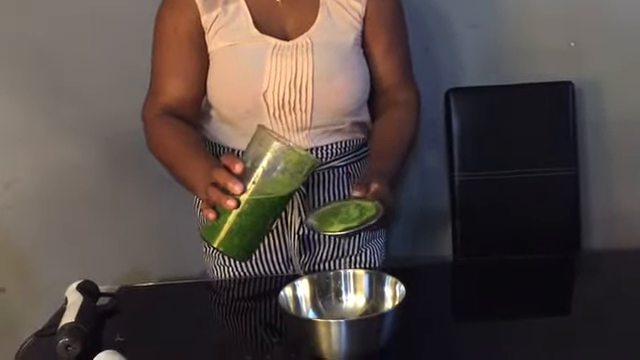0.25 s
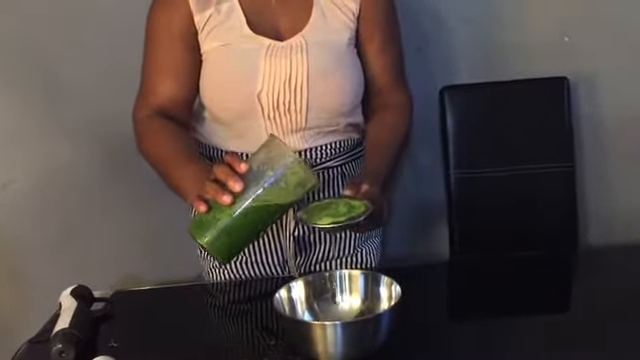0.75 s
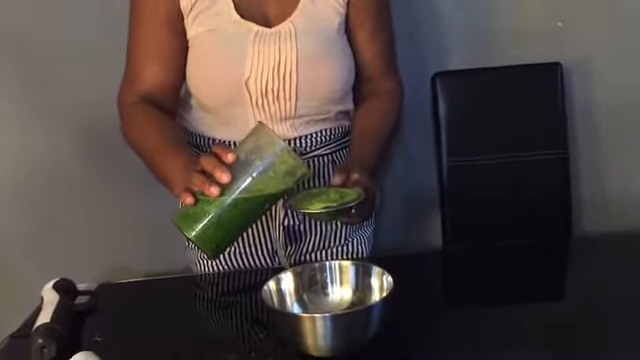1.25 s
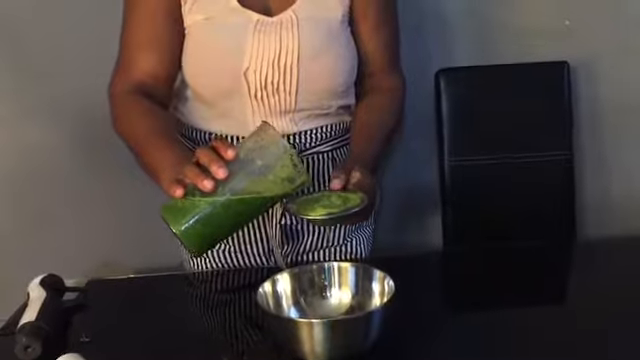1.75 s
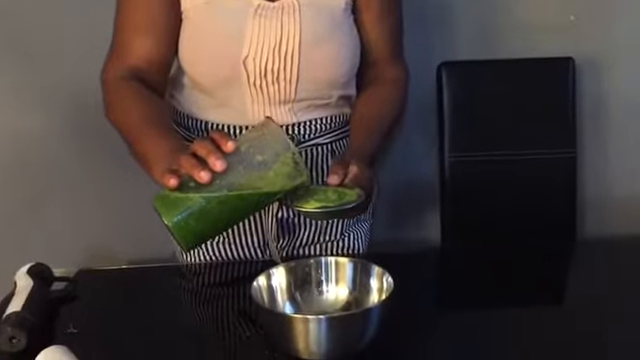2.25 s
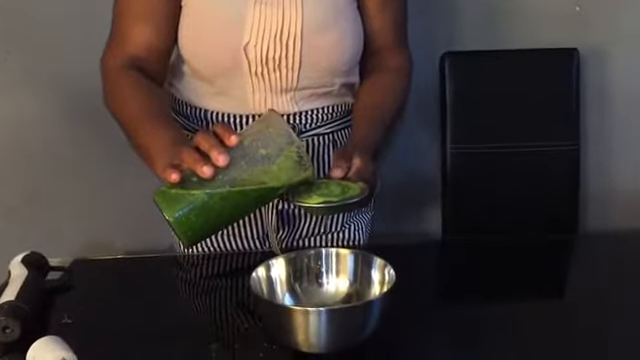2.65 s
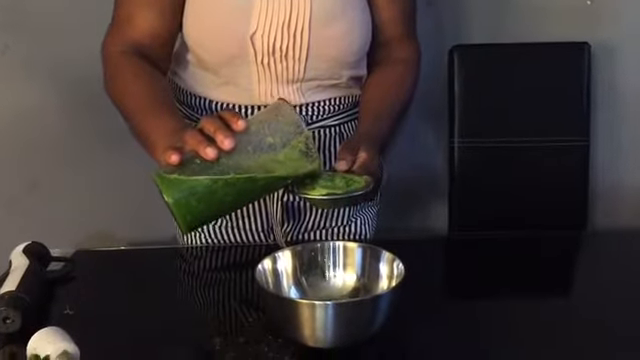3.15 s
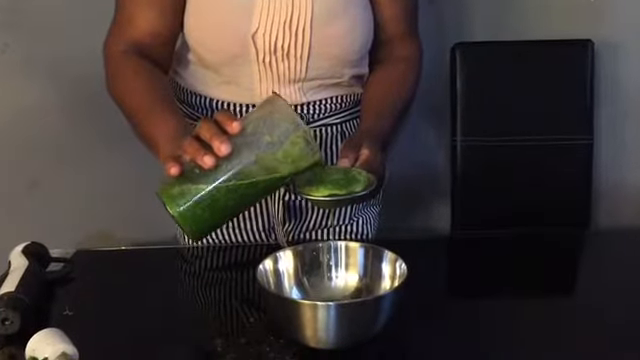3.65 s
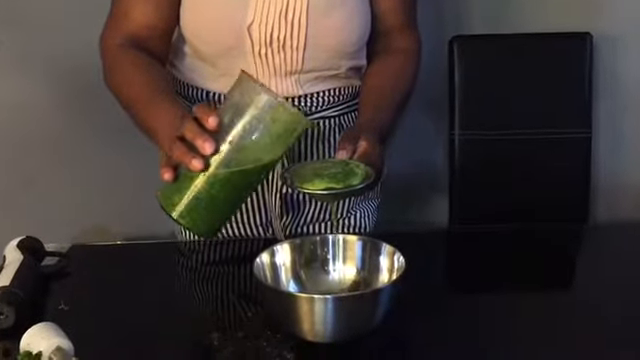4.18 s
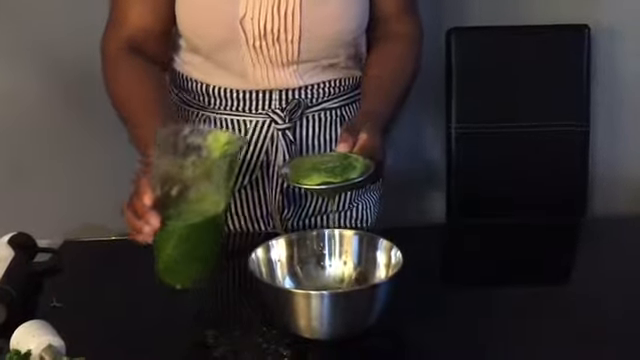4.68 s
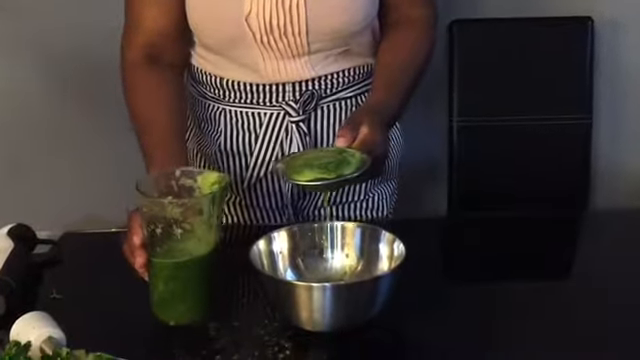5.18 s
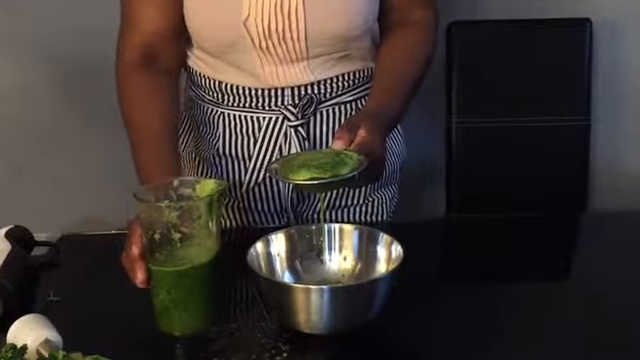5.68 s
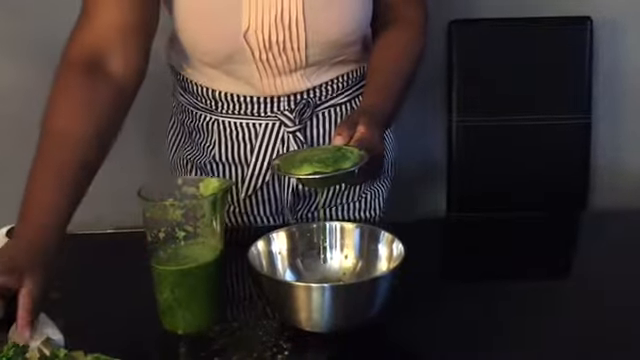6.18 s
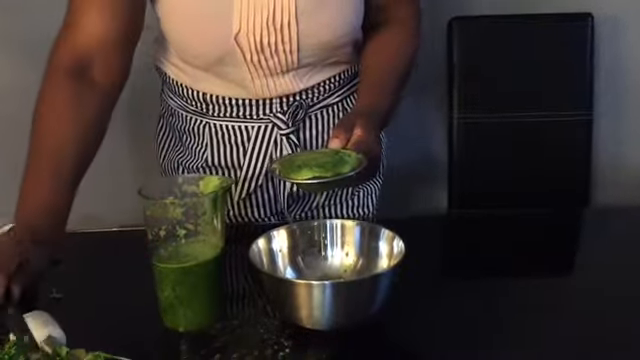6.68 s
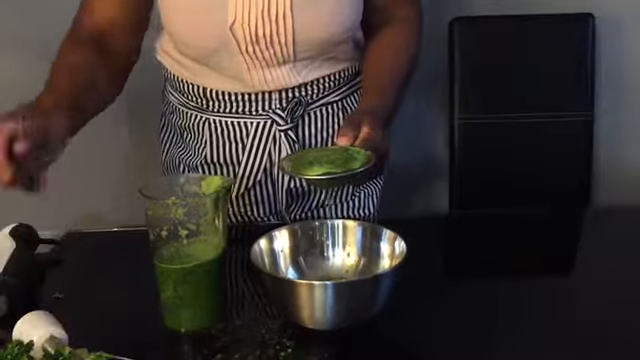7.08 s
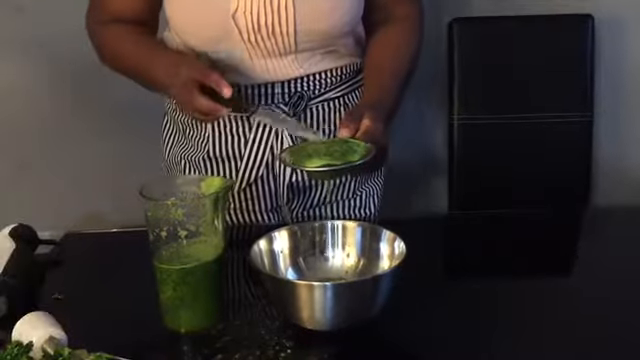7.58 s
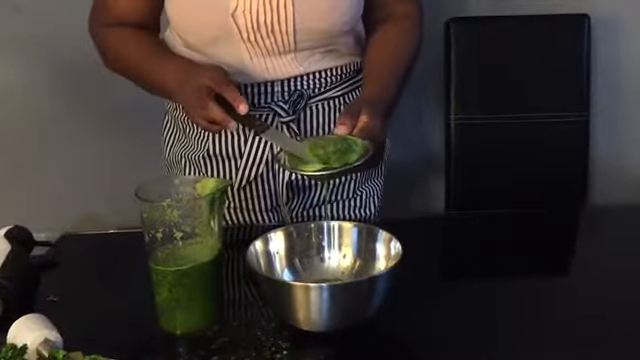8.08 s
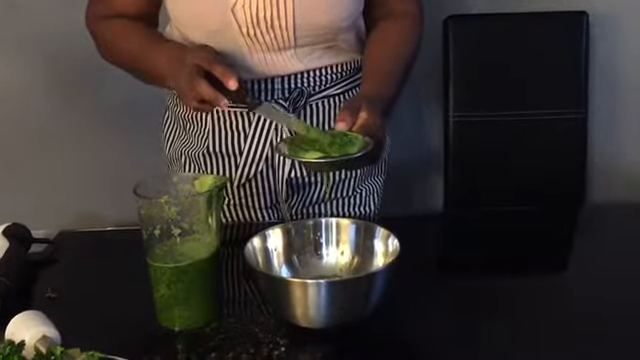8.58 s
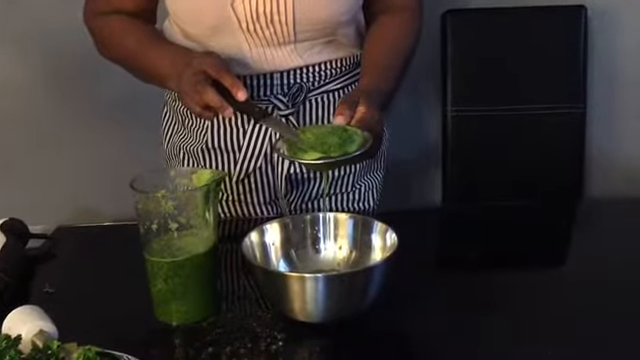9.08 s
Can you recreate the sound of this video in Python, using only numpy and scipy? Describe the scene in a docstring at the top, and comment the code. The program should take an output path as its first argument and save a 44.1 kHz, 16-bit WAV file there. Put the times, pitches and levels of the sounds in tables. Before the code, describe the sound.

Thick green juice drips through a small sieve into a nearly empty steel bowl. Low plops and bright metallic splats patter quickly, thin out, then thicken again. Midway a full glass jar lands on the stone table with one dull thud. Dripping continues busily, with soft faint bumps. Hard-walled kitchen, phone a metre or two away, faint room hush.

```python
"""Short plops and sharp splats run throughout: thick juice drips from a sieve into an empty steel bowl on a stone table.
Each drop is a brief decaying sine with an impact tick, small drops are a random patter, and spray is bursts of noise.
The drops ring the bowl through resonators; a full jar set down once thuds by shaking table, jar and bowl.
Soft low bumps from hands and feet join in, and a hard-walled kitchen answers with a noise-built tail.
A phone a metre or two away hears it over a faint, unsteady room hush."""
import sys
import numpy as np
from scipy import signal
from scipy.fft import rfft, irfft
from scipy.io import wavfile
from scipy.ndimage import uniform_filter1d

SR = 44100
rng = np.random.default_rng(int(sys.argv[2]) if len(sys.argv) > 2 else 0)


def wav_out(sig):
    """Save sig, one row per channel (or a flat mono array), as 16-bit PCM at SR to the path in sys.argv[1]."""
    wavfile.write(sys.argv[1], SR, np.round(np.clip(np.atleast_2d(sig).T, -1, 1) * 32767).astype(np.int16))


N = 411894

# Heavy drops that land softly. Each row: start in seconds, relative level in dB, pitch in Hz,
# decay to 1 / e in cycles.
PLOPS = [(0.059, -33, 808, 1.5), (0.1, -36, 1090, 5.3), (0.101, -36.5, 1637, 5.7), (0.191, -44, 1120, 4.6),
         (0.193, -36, 1577, 5), (0.234, -41.5, 903, 6.2), (0.289, -23, 1098, 0.37), (0.419, -32, 713, 3),
         (0.562, -27.5, 804, 0.54), (0.563, -31, 1500, 1.8), (0.652, -33, 1616, 7.5),
         (0.748, -44, 700, 4.3), (0.79, -46, 625, 5), (0.812, -45.5, 1120, 8.2), (1.034, -34.5, 1650, 2.8),
         (1.044, -38.5, 870, 3.1), (1.096, -37.5, 900, 2.2), (1.141, -33, 810, 2.1), (1.17, -39, 827, 2.7),
         (1.171, -36, 1680, 4), (1.205, -39, 1560, 12), (1.274, -34.5, 1873, 7.9), (1.377, -35, 1003, 1.8),
         (1.589, -35.5, 1570, 3.6), (1.59, -37.5, 1105, 4.4), (1.816, -33.5, 1140, 1.6),
         (1.84, -38, 1660, 3.8), (1.862, -32, 940, 2), (2.093, -44, 1700, 7.2), (2.06, -45, 1320, 6),
         (2.122, -37, 1270, 3.8), (2.576, -43.5, 1580, 7.6), (2.604, -41, 1656, 12),
         (2.897, -44.5, 1360, 12), (2.997, -46.5, 1624, 13), (4.029, -27.5, 2060, 0.33),
         (4.131, -28.5, 820, 0.41), (4.132, -41, 1660, 6.5), (4.133, -36, 2010, 4.7),
         (4.246, -30.5, 746, 3.4), (4.247, -37, 1600, 5.7), (4.315, -43, 1624, 8.5),
         (4.345, -40.5, 1240, 4.3), (4.401, -41.5, 1530, 6), (4.403, -38.5, 846, 4.1),
         (4.489, -36.5, 660, 3.5), (4.614, -37, 786, 2.8), (4.645, -37.5, 664, 4), (4.665, -41, 1633, 7.3),
         (4.792, -38, 1620, 4.3), (4.924, -37, 694, 1.8), (4.946, -29.5, 660, 1.4),
         (5.071, -34.5, 630, 4.4), (5.195, -37, 710, 1.2), (5.596, -32, 671, 2.5), (5.625, -51, 637, 5.3),
         (5.676, -35.5, 1100, 5.3), (5.765, -46, 1530, 5.4), (5.774, -37, 690, 2.6), (5.82, -39, 616, 2.2),
         (5.881, -39, 1110, 2.2), (5.919, -32.5, 1035, 1.3), (5.921, -37, 2020, 7),
         (5.975, -37.5, 1730, 3.7), (6.048, -40, 1670, 3.6), (6.079, -24, 1560, 0.5), (6.1, -40, 1770, 10),
         (6.291, -33.5, 770, 0.54), (6.345, -40, 973, 5.4), (6.414, -39, 1654, 6.7),
         (6.44, -32.5, 2047, 7.6), (6.521, -37.5, 1280, 6.5), (6.544, -38.5, 1274, 4.3),
         (6.799, -36, 980, 1.2), (6.912, -31, 1020, 0.67), (6.982, -31.5, 1943, 15), (7.079, -42.5, 740, 3),
         (7.202, -44, 1610, 5.7), (7.343, -37, 1405, 4.1), (7.345, -43, 2120, 12),
         (7.507, -30.5, 1260, 0.44), (7.551, -33, 1145, 0.69), (7.674, -38.5, 1385, 6.6),
         (7.735, -41, 2160, 5), (7.996, -38.5, 1590, 1.1), (8.244, -31, 1440, 0.62),
         (8.425, -31.5, 1060, 0.71), (8.468, -35, 973, 4), (8.469, -40, 1990, 11), (8.489, -34, 730, 1.7),
         (8.632, -42, 1580, 6), (8.69, -49, 650, 4), (8.728, -38.5, 683, 3.4), (8.782, -32, 1700, 2.8),
         (8.835, -30.5, 1330, 3.1), (8.911, -29.5, 805, 1.8), (8.916, -36, 1750, 5.4),
         (8.967, -29.5, 1860, 2.7), (8.986, -29.5, 1725, 4.7), (9.036, -38, 1606, 6.4),
         (9.121, -33.5, 1250, 3.1), (9.249, -33.5, 710, 2.7), (9.29, -34.5, 1640, 8.3)]
# Drops that burst on bare steel. Each row: start in seconds, relative level in dB, pitch in Hz,
# decay to 1 / e in cycles.
SPLATS = [(0.0677, -29.5, 3000, 2.2), (0.0987, -38, 4010, 20), (0.192, -34.5, 2740, 9.7),
          (0.3889, -33, 3700, 3.6), (0.41, -37, 3780, 4.2), (0.43, -39, 3840, 5.4),
          (0.46, -32.5, 3440, 1.9), (0.5044, -39, 3550, 2), (0.5589, -34, 3400, 3),
          (0.7123, -31.5, 2940, 2.4), (0.847, -38.5, 2550, 8.7), (0.929, -38.5, 4500, 2.1),
          (0.969, -41, 4330, 4), (1.1165, -39.5, 3200, 2.7), (1.2, -42, 3920, 2.6), (1.41, -46, 2540, 9.3),
          (1.4484, -40, 3250, 3.7), (1.5399, -41.5, 3110, 14), (1.6788, -34, 3770, 1.8),
          (1.8126, -40.5, 2190, 9.7), (1.845, -37.5, 2190, 8), (1.904, -46, 4260, 3.2),
          (2.071, -46.5, 3870, 4), (2.577, -39.5, 3180, 2.6), (2.944, -47, 3470, 5.3),
          (3.089, -40, 3070, 0.86), (3.67, -40, 5530, 5), (4.0284, -25, 3360, 0.91),
          (4.155, -40.5, 4600, 4), (4.2327, -26.5, 4700, 1.7), (4.27, -35.5, 3600, 3),
          (4.361, -29, 4390, 6), (4.423, -43, 3300, 13), (4.548, -36, 4040, 5), (4.572, -46, 4300, 3),
          (4.606, -39.5, 4540, 2.8), (4.662, -45, 3280, 4.6), (4.68, -40.5, 3460, 2.5),
          (4.778, -40, 2600, 3.3), (4.8915, -36.5, 3440, 6), (4.923, -39.5, 3450, 4.6),
          (5.048, -45, 3650, 3.5), (5.0714, -25, 3480, 6.9), (5.1637, -40.5, 3400, 11),
          (5.2175, -31, 3170, 5.3), (5.255, -31.5, 3740, 2.5), (5.268, -37, 5570, 3.9),
          (5.4054, -32, 3530, 2.7), (5.411, -33.5, 5300, 5.5), (5.436, -39, 5500, 4.3),
          (5.452, -40, 5700, 5), (5.471, -32, 3340, 5.8), (5.5058, -32, 2500, 1.7),
          (5.5603, -35, 5340, 6.3), (5.561, -36, 4020, 5.7), (5.7295, -45, 3280, 6.2),
          (5.746, -44, 3450, 5), (5.764, -44, 2820, 3.7), (5.8082, -36, 5230, 3.6), (5.811, -47, 3080, 4),
          (5.88, -37.5, 5460, 4.4), (5.9085, -31.5, 3240, 1.4), (5.974, -26, 5090, 8),
          (5.9745, -25, 3200, 3), (6.008, -37, 3780, 4.5), (6.079, -48, 3460, 3), (6.1006, -42, 3230, 4.5),
          (6.1335, -30, 3020, 1.4), (6.2223, -36.5, 5440, 2.7), (6.299, -37, 2600, 2.4),
          (6.374, -27, 3220, 3.2), (6.4816, -37.5, 3400, 5.5), (6.542, -33.5, 3630, 4.7),
          (6.5975, -43, 3380, 5.8), (6.635, -41.5, 3500, 4.4), (6.6792, -33, 3680, 0.69),
          (6.7276, -34.5, 3350, 2.8), (6.834, -44.5, 3460, 5), (6.915, -45, 3100, 3),
          (6.932, -38, 3600, 1.5), (6.969, -34.5, 3860, 4.7), (6.982, -33, 2150, 1.6),
          (7.092, -41, 3470, 4.3), (7.2002, -25.5, 3240, 4.6), (7.2544, -39, 3730, 3.5),
          (7.227, -50, 3420, 3.8), (7.266, -39, 3400, 2.8), (7.401, -38.5, 3670, 8.2),
          (7.5527, -34.5, 2500, 6.2), (7.669, -31, 3180, 2.9), (7.734, -30, 4010, 5.6),
          (7.7934, -27.5, 3200, 0.78), (7.8466, -39, 3500, 5), (7.9244, -32.5, 3230, 4.9),
          (8.1806, -39.5, 4150, 9.1), (8.2034, -42, 3380, 5), (8.2933, -36.5, 3820, 5.1),
          (8.3395, -42, 3500, 4), (8.3779, -40, 3240, 5.1), (8.419, -41, 4200, 5.9),
          (8.468, -39.5, 2680, 4.2), (8.52, -37, 3230, 7.5), (8.558, -41, 3040, 5),
          (8.5822, -32, 3230, 6.4), (8.6318, -36, 3160, 5.4), (8.717, -44, 4600, 2.5),
          (8.764, -34.5, 3480, 1.1), (8.8316, -36.5, 4330, 5.5), (8.9268, -35, 3650, 4.4),
          (8.9635, -22, 3630, 5.9), (8.985, -25.5, 3940, 7.5), (9.002, -37, 3550, 6.6),
          (9.157, -47, 3360, 6), (9.21, -47, 3250, 6), (9.2415, -39.5, 3400, 2.7), (9.2866, -37, 2480, 3),
          (9.3007, -28.5, 4340, 2.3)]
# Modes of the steel bowl. Each row: frequency in Hz, relative level in dB, decay by 60 dB in seconds.
BOWL_MODES = [(625, -6, .4), (662, -4, .4), (719, -2, .35), (768, -6, .25), (811, -1, .35), (863, -4, .35),
              (919, 0, .45), (954, 0, .4), (1014, -3, .4), (1081, -4, .4), (1122, -7, .3), (1152, -3, .4),
              (1284, -1, .5), (1385, -7, .3), (1470, -6, .3), (1540, -7, .25), (1650, -5, .25),
              (1700, -1, .3), (1755, -4, .2), (1985, -7, .25), (2170, -6, .22), (2350, -10, .2),
              (2670, -11, .18), (3050, -9, .15), (3380, -11, .12), (3560, -12, .12), (4120, -10, .15),
              (4470, -10, .15), (5300, -12, .12)]


def undb(db):
    """Definition of the decibel: an amplitude gain is ten to the power of dB / 20."""
    return 10 ** (np.asarray(db) / 20)


def unit(x):
    """Normalisation of power: scale a signal to rms 1."""
    return x / np.sqrt(np.mean(x ** 2))


def wander(rate_hz):
    """Slow random modulation: normal values, each held 1 / rate_hz s, smoothed by a moving mean as long."""
    hold = int(SR / rate_hz)
    steps = np.repeat(rng.standard_normal(N // hold + 1), hold)
    return uniform_filter1d(steps, hold)[:N]


def butter(x, order, hz, kind):
    """Linear filtering: a Butterworth filter, flat in its pass band."""
    return signal.sosfilt(signal.butter(order, hz, kind, fs=SR, output="sos"), x)


def add_drop(out, s, db, hz, cycles, glide=0., tick=0., rise=0.5):
    """Damped oscillation: an impact tick and a sine that dies in a few cycles, rising as the cavity closes."""
    cycles = np.clip(cycles, .4, 40)
    turns = np.arange(int(5 * cycles * SR / hz) + 2) * hz / SR
    shape = np.exp(-turns / cycles) * (1 - np.exp(-turns / rise))  # rise is in cycles too
    wave = shape / shape.max() * np.sin(2 * np.pi * turns * (1 + glide * turns / cycles))
    wave += tick * 2.0 * turns * np.exp(-turns / 0.55) * np.sin(2 * np.pi * 1.49 * turns)
    start = min(int(s * SR), N)
    out[start:start + len(wave)] += undb(db) * wave[:max(N - start, 0)]


def heavy_drops(table, glide, tick, rise, after_s, after_db):
    """Superposition of damped oscillations: each drop's tail follows in smaller beads of nearly its pitch."""
    beads_each, bead_spread = 5, 0.16  # count, and the share by which their pitch varies
    out = np.zeros(N)
    for (s, db, hz, cycles), beads in zip(table, rng.random((len(table), beads_each, 3))):
        add_drop(out, s, db, hz, cycles, glide, tick, rise)
        for late, size, pitch in beads:
            bead_db = db + after_db * (.5 + late + size)
            bead_hz = hz * (1 + bead_spread * (pitch - .5))
            add_drop(out, s + after_s * late, bead_db, bead_hz, max(cycles, 3), glide, 0, rise)
    return out


def splash(table, fade_s, low_hz=0, high_hz=SR):
    """Exponential relaxation: the level of thrown droplets jumps with each drop of a pitch range and fades."""
    kicks = np.zeros(N)
    s, db, hz = np.transpose(table)[:3]
    np.add.at(kicks, (s * SR).astype(int), undb(db) * (hz > low_hz) * (hz <= high_hz))
    return signal.lfilter([1], [1, -np.exp(-1 / (fade_s * SR))], kicks)


def patter(low_hz, high_hz, cycles, count, sizes_db=13):
    """Superposition of random impacts: many small drops of random time, pitch and size; rms 1."""
    out = np.zeros(N)
    for when, pitch, size in rng.random((count, 3)):
        hz = low_hz * (high_hz / low_hz) ** pitch
        add_drop(out, when * N / SR, sizes_db * size, hz, cycles, tick=0.18)
    return unit(out)


def small_drops():
    """Amplitude modulation of patter: a slow dribble level plus droplets thrown by each heavy drop."""
    # The dribble between heavy drops. Each row: time in seconds, then the base levels in dB
    # of fat, middling and fine drops.
    dribble = [(0.0, -55, -52.5, -69.5), (0.34, -55.5, -69, -60.5), (0.91, -57, -59.5, -65.5),
               (1.22, -61, -64, -67.5), (1.69, -62.5, -63, -76.5), (1.98, -63.5, -57.5, -67.5),
               (2.68, -80.5, -66.5, -71.5), (3.61, -73.5, -62, -69), (4.06, -61, -67.5, -66.5),
               (4.27, -74, -71, -61), (4.63, -51, -58.5, -66.5), (5.33, -57, -51, -58.5),
               (5.62, -50, -54, -66.5), (6.43, -63.5, -60.5, -68.5), (8.27, -67, -70.5, -71),
               (8.59, -52, -56.5, -61), (9.03, -56, -63, -66), (9.34, -57, -58, -70)]
    s, *columns = np.transpose(dribble)
    fat_db, middling_db, fine_db = (np.interp(np.arange(N) / SR, s, db) for db in columns)
    split_hz = 1180  # deep plops lie below, high ones above
    deep = splash(PLOPS, 0.012, high_hz=split_hz)
    high = splash(PLOPS, 0.0091, low_hz=split_hz)
    burst = splash(SPLATS, 0.011)

    fat_level = undb(fat_db) + undb(-17) * deep
    middling_level = undb(middling_db) + undb(-17.5) * deep + undb(-22) * high
    fine_level = undb(fine_db + 5.4 * wander(14)) + undb(-24.5) * burst + undb(-23.5) * high
    mist_level = undb(fine_db - 8.0 + 4.1 * wander(14))

    fat = fat_level * patter(624.6, 1182, 3.37, count=600)
    middling = middling_level * patter(1194, 2393, 4.1, count=700)
    fine = fine_level * patter(2505, 4430, 2.9, count=2000)
    mist = mist_level * patter(4220, 13300, 3.2, count=2500, sizes_db=12.4)
    return fat + middling, fine, mist


def spray():
    """Band-limited noise bursts: spray ticks on the rim around a pitch, then fizzes with random crackle."""
    # Fine spray. Each row: start in seconds, relative level in dB, pitch in Hz.
    spray_ticks = [(0.2882, -50, 11900), (0.6245, -48, 7340), (0.6537, -46, 7000), (0.7808, -42, 7700),
                   (1.116, -44, 14000), (1.17, -49, 14300), (1.413, -50.5, 7750), (1.447, -51, 14100),
                   (1.6434, -47, 11900), (2.548, -54, 7540), (3.32, -49, 6700), (3.6706, -53, 8300),
                   (4.0156, -48.5, 9640), (4.087, -41.5, 9000), (4.1127, -42, 8400), (4.268, -45.5, 9400),
                   (4.453, -46.5, 9400), (4.5488, -49.5, 9100), (4.591, -49, 11400), (4.679, -39, 8300),
                   (5.216, -48, 7500), (5.436, -50, 6900), (5.5862, -49.5, 9500), (5.8086, -42.5, 14600),
                   (6.222, -49.5, 12100), (6.412, -46, 6300), (6.5136, -52.5, 7850), (6.884, -55, 12000),
                   (6.9822, -36.5, 5730), (6.9816, -43, 8200), (6.9817, -39, 11100), (6.9818, -42, 14300),
                   (7.472, -61, 9000), (7.5508, -43, 9500), (7.7752, -53, 12500), (8.2482, -48, 6460),
                   (8.379, -51.5, 8740), (8.4672, -50, 9300), (8.5805, -42.5, 11500), (8.8313, -43.5, 6040),
                   (9.085, -47.5, 8700), (9.2409, -51.5, 8800), (9.2853, -52.5, 10600)]
    tick_s, fizz_s, fizz_db = 0.0016, 0.019, -12.5  # the tick dies by 1 / e in tick_s
    half_band = 2 ** (0.41 / 2)  # the band is 0.41 octave wide
    out, t = np.zeros(N + SR), np.arange(SR // 10) / SR
    noises = rng.standard_normal((len(spray_ticks), 2, len(t)))
    for (s, db, hz), (hiss, jumps) in zip(spray_ticks, noises):
        band = [hz / half_band, min(hz * half_band, .45 * SR)]
        crackle = undb(6.9 * np.repeat(jumps, SR // 1000)[:len(t)])  # a new level about every millisecond
        fizz = undb(fizz_db) * crackle * t / fizz_s * np.exp(1 - 2 * t / fizz_s)
        burst = unit(butter(hiss, 2, band, "band")) * (np.exp(-t / tick_s) + fizz)
        out[int(s * SR):int(s * SR) + len(t)] += undb(db) * burst
    return out[:N]


def ring(x, modes, place_db=0.):
    """Modal synthesis: one damped resonator a mode, in alternating sense; place_db varies their drive in time."""
    out = 0
    for k, (hz, db, t60) in enumerate(modes):
        pole = np.exp(2j * np.pi * hz / SR - np.log(1000) / (t60 * SR))
        drive = x * undb(place_db * wander(12))  # each blow lands elsewhere
        out = out + (-1) ** k * undb(db) * signal.lfilter([1], [1, -pole], drive).imag
    return out


def drops():
    """Forced vibration: landing drops drive the bowl, which radiates little below its first mode."""
    fat_and_middling, fine, mist = small_drops()
    plops = heavy_drops(PLOPS, 0.0084, 0.22, rise=0.98, after_s=.085, after_db=-9)
    splats = heavy_drops(SPLATS, 0.021, 0.075, rise=1.37, after_s=.06, after_db=-12.5)
    soft, sharp = plops + fat_and_middling, splats + fine
    ringing = ring(undb(-56) * soft + undb(-49.0) * sharp, BOWL_MODES, place_db=3.5)

    bright = undb(-4.5) * sharp + mist + undb(-3.0) * spray()
    echo_s, echo_db = 0.002006, -9.5  # the far side of the bowl throws the bright sounds back
    echo = undb(echo_db) * np.roll(bright, int(echo_s * SR))
    landing = undb(-6) * soft + bright + echo
    return butter(landing, 4, 540, "high"), butter(ringing, 4, 540, "high")


def jar(push_s=0.00072):
    """Impulsive excitation: a push shakes table, jar and bowl, and leaves a dull, noisy low rumble that dies away."""
    # The jar meets the table. Each row: start in seconds, relative level of the push in dB.
    jar_blow = [(5.364, -17)]
    # Modes of the table top. Each row: frequency in Hz, relative level in dB, decay by 60 dB in seconds.
    table_modes = [(75, -16, .6), (133, -1, .33), (200, -9, .2), (243, -6, .3), (269, -2, .3),
                   (300, -5, .2), (330, -7, .15), (415, 0, .45), (500, -11, .2)]
    # Modes of the full jar. Each row: frequency in Hz, relative level in dB, decay by 60 dB in seconds.
    jar_modes = [(308, -7, 0.097), (693, -13, 0.11), (941, 0, 0.083), (1310, -6.5, .1)]
    (s, db), = jar_blow
    blow, push = np.zeros(N), np.hanning(max(int(push_s * SR), 4))
    blow[int(s * SR):int(s * SR) + len(push)] = undb(db) * push
    knock = butter(blow, 2, 200, "high")

    rumble_db, rumble_t60_s = -34.5, 0.39
    after = np.arange(N) / SR - s
    low_noise = unit(butter(rng.standard_normal(N), 3, [90, 1000], "band"))
    rumble_level = undb(rumble_db + 1.6 * wander(120) - 60 * np.abs(after) / rumble_t60_s)
    rumble = low_noise * (after > 0) * rumble_level

    shaking = undb(-25.5) * ring(blow, jar_modes) + undb(-35.5) * ring(blow, table_modes)
    shaking = shaking + undb(-39.5) * ring(blow, BOWL_MODES)
    return undb(-13) * knock + rumble, shaking


def bumps():
    """Damped low oscillation: soft bumps from hands and feet, all dying in the same time."""
    # Soft bumps. Each row: start in seconds, relative level in dB, pitch in Hz.
    bump_rows = [(0.768, -49.5, 295), (1.864, -54, 288), (2.082, -54.5, 85), (3.208, -53, 287),
                 (4.125, -51.5, 268), (4.65, -55, 265), (5.073, -54, 238), (6.51, -53, 392),
                 (8.6, -57, 286)]
    dies_s = 0.017  # time to die by 1 / e
    out = np.zeros(N)
    for s, db, hz in bump_rows:
        add_drop(out, s, db, hz, dies_s * hz, glide=0.0029, rise=1.9)
    return undb(-3) * out


def room(first_s=0.00316, early_s=0.0075, early_db=7.5):
    """Diffuse reverberation: octave noise bands decay each at its own rate; near surfaces answer strongest."""
    # Decay of the kitchen. Each row: frequency in Hz, decay by 60 dB in seconds.
    room_t60 = [(100, 0.39), (1000, 0.69), (4000, 0.27), (16000, 0.27)]
    t, tail = np.arange(int(.8 * SR)) / SR, 0
    hz, t60 = np.transpose(room_t60)
    for f in 90 * 2. ** np.arange(8):
        band = butter(rng.standard_normal(len(t)), 2, [f / np.sqrt(2), f * np.sqrt(2)], "band")
        tail = tail + band * undb(-60 * t / np.interp(np.log(f), np.log(hz), t60))
    tail = tail * (t > first_s) * undb(early_db * np.exp(-(t / early_s) ** 2))
    return tail / np.sqrt(np.sum(tail ** 2))  # unit energy


def hush():
    """Spectrally shaped noise: distant house noise whose lows and highs swell and flicker apart."""
    # Spectrum of the hush. Each row: frequency in Hz, relative spectral level in dB.
    hush_spectrum = [(15, -63), (25, 9.5), (60, 4), (197, 4), (706, -13), (878, -2), (1150, -7.5),
                     (1390, -2.5), (1880, -18), (2040, -7), (5720, -14.5), (10400, -22), (15700, -20)]
    hz, db = np.transpose(hush_spectrum)
    f = np.maximum(np.arange(N // 2 + 1) * SR / N, 1)
    noise = rfft(rng.standard_normal(N)) * undb(np.interp(np.log(f), np.log(hz), db))
    low = 1 / (1 + (f / 450) ** 4)  # share of the lows, crossing over at 450 Hz
    bass, rest = irfft(noise * low, N), irfft(noise * (1 - low), N)
    return undb(-65) * unit(bass * undb(2.2 * wander(6)) + rest * undb(1.5 * wander(9)))


def scene():
    """Superposition of direct and reverberant sound: short sounds fill the room, rings are heard mostly straight."""
    room_db, rings_wet_db = -5.5, -5.5
    landing, ringing = drops()
    knock, shaking = jar()
    short, rings = landing + knock + bumps(), ringing + shaking
    into_room = short + undb(rings_wet_db) * rings
    reverberant = undb(room_db) * signal.fftconvolve(into_room, room())[:N]
    return (short + rings + reverberant + hush())[None]


def record(dry):
    """Filtering: weak deepest bass, a narrow dip near 10.4 kHz and a steep cut near 15.8 kHz."""
    thin = butter(dry, 2, 65, "high")
    thin = thin - 0.34 * signal.lfilter(*signal.iirpeak(10400, 14.0, fs=SR), thin)
    return signal.sosfilt(signal.ellip(10, .2, 60, 15800, fs=SR, output="sos"), thin)


dry = scene()
out = record(dry)
wav_out(out)
```